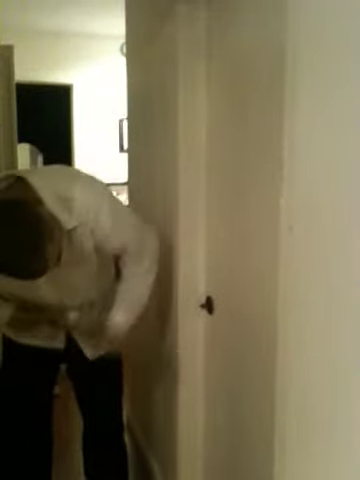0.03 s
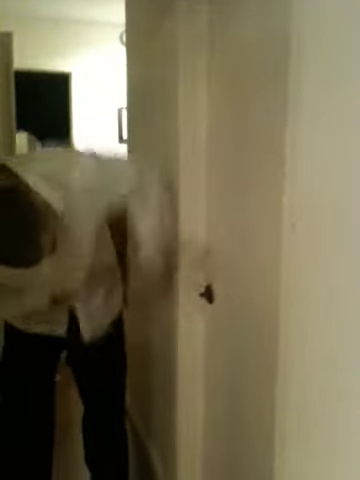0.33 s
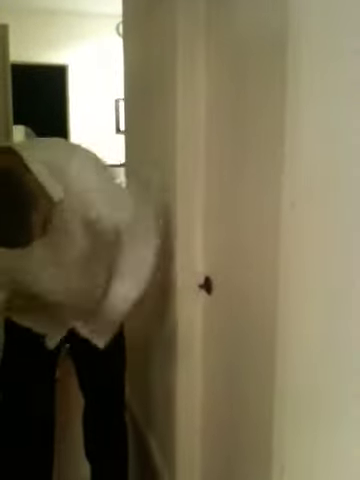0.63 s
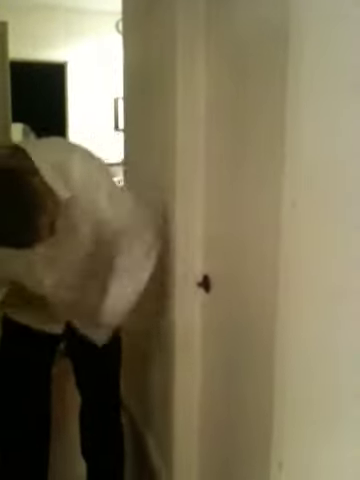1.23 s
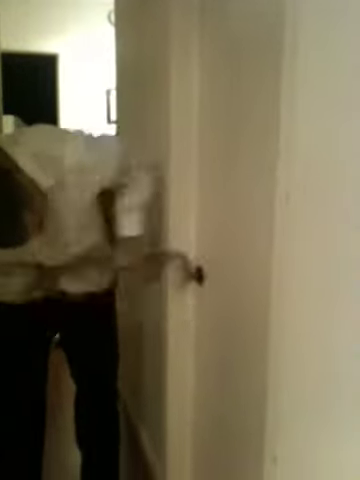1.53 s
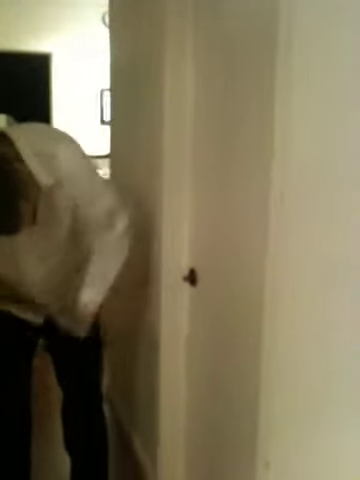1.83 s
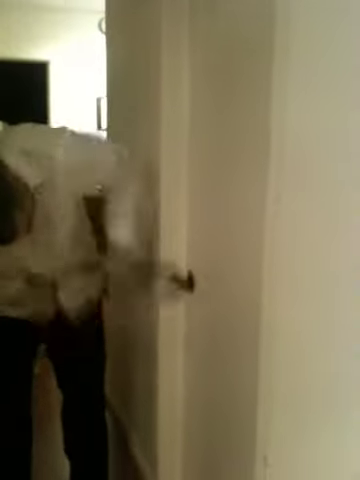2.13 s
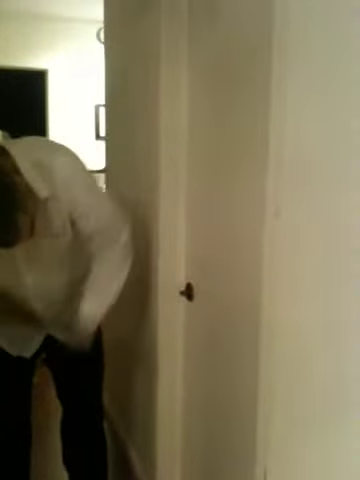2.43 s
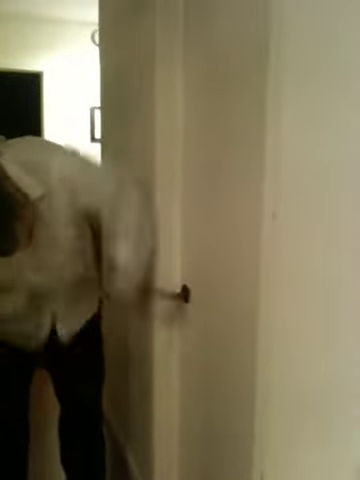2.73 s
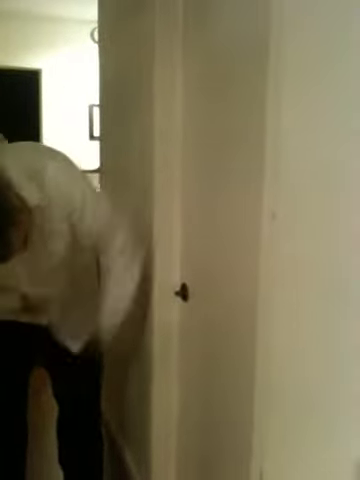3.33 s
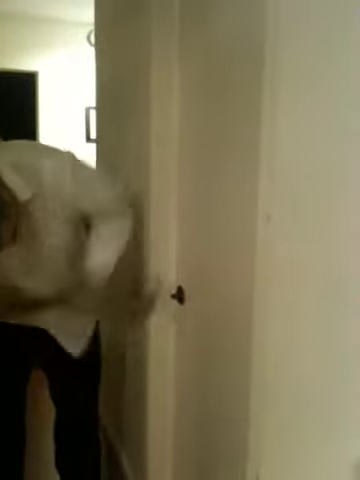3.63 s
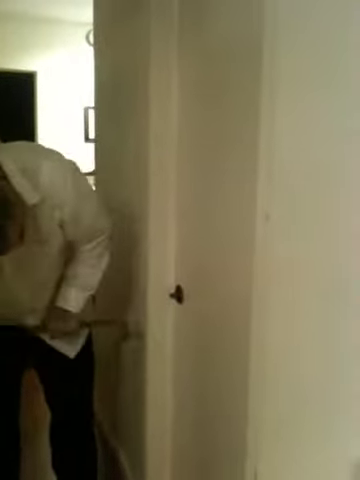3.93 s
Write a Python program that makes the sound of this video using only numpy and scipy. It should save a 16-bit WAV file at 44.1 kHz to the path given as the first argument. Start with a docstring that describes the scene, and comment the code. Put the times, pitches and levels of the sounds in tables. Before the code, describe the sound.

Loud metal bangs on a doorknob, repeating steadily in an echoing hallway.

```python
"""Metal bar on a doorknob

Someone swings a metal bar at the knob of a closed wooden door, about every 0.6 s, in a bare hallway.
Each impact cracks and excites the modes of bar, knob and door: the metal rings and the panel booms.
The hallway reverberates and the microphone overloads. The loose knob jingles faintly between some blows."""
import sys
import numpy as np
from scipy import signal
from scipy.io import wavfile

SR = 44100
rng = np.random.default_rng(int(sys.argv[2]) if len(sys.argv) > 2 else 0)


def log_audio(samples):
    """Write samples as a 16-bit WAV file to the path given in sys.argv[1]."""
    # one column per channel
    frames = np.atleast_2d(samples).T
    # limit to full scale, then quantise
    limited = np.clip(frames, -1, 1)
    pcm = np.round(limited * 32767).astype(np.int16)
    wavfile.write(sys.argv[1], SR, pcm)


N = 176400
AGE = np.arange(int(.65 * SR)) / SR  # time since an impact [s]
EDGES = np.geomspace(22, 17500, 30)  # third-octave band edges [Hz]
CENTRES = np.sqrt(EDGES[1:] * EDGES[:-1])

def from_db(db):
    """Amplitude ratio: a factor of ten for every 20 dB."""
    return 10 ** (np.asarray(db) / 20)

def at_hz(points, hz):
    """Interpolation of (frequency, value) points on a log-frequency axis."""
    frequencies, values = np.transpose(points)
    return np.interp(np.log(hz), np.log(frequencies), values)

def band_pass(sound, k):
    """Band-pass filtering to third-octave band k."""
    return signal.sosfilt(signal.butter(2, EDGES[k:k + 2], "band", fs=SR, output="sos"), sound)

def noise_bands(size):
    """Filter-bank analysis of white noise, one row per band."""
    white = rng.standard_normal((2, size + SR // 4))
    return np.array([band_pass(white[k % 2], k)[-size:] for k in range(len(CENTRES))])

def band_gains(spectrum):
    """Power normalisation: gains that give the bands this spectrum and a total rms near 1."""
    gain = from_db(at_hz(spectrum, CENTRES))
    return gain / np.sqrt(np.sum(gain ** 2 * np.diff(EDGES)) * 2 / SR)

def decay(t60):
    """Exponential damping: a fall of 60 dB in t60 seconds."""
    return np.exp(-np.log(1000) * AGE / t60)

def swell_and_die(swell_s, t60):
    """Transient response: first-order build-up, then exponential decay."""
    return (1 - np.exp(-AGE / swell_s)) * decay(t60)

def add(track, time_s, sound):
    """Superposition of a sound at an onset time, which may be negative."""
    start = int(round(time_s * SR))
    part = sound[max(-start, 0):N - start]
    track[max(start, 0):max(start, 0) + len(part)] += part

def ring(modes, colour, swell_s, scatter_db=2, wander=1):
    """Modal superposition: damped sinusoids of random strength and phase, wavering as reflections join."""
    out, wander_step_s = 0, .011
    for hz, db, t60 in modes:
        steps = rng.standard_normal((2, 400))
        in_phase, quadrature = (wander * np.interp(AGE / wander_step_s, np.arange(400), row)
                                for row in steps)
        phase = 2 * np.pi * (hz * AGE + rng.random())
        tone = ((1 + in_phase) * np.sin(phase) + quadrature * np.cos(phase)) / np.sqrt(1 + wander ** 2)
        gain = from_db(db + at_hz(colour, hz) + scatter_db * rng.standard_normal())
        out = out + gain * tone * swell_and_die(swell_s, t60)
    return out

# Noise floor spectrum: (frequency [Hz], relative density [dB])
FLOOR_SPECTRUM = [(30, -32), (60, -24), (100, -10), (155, 6), (210, -2), (320, 0), (550, -6), (1400, -7.5),
                  (2500, -13), (6000, -16), (11000, -19), (15500, -22)]

def background():
    """Stationary noise: faint room tone and microphone hiss."""
    return from_db(-68.2) * band_gains(FLOOR_SPECTRUM) @ noise_bands(N)

# Clinks of the loose knob: (time [s], level [dB], T60 of added damping by the bar [s])
CLINK_EVENTS = [(1.126, -41, 1.2), (1.189, -40.5, 1.5), (1.248, -48, 2.1), (1.281, -43.5, 1.4),
                (1.536, -47, 0.072), (1.699, -34, 0.91), (2.022, -58, .08), (2.445, -49.5, 0.51)]
# Modes of a clink: (frequency [Hz], level [dB], T60 before that damping [s])
LOOSE_KNOB_MODES = [(6860, -11, 0.3), (7612, -16.5, .25), (7700, -10, 0.23), (9630, -4, 0.31),
                    (13900, -21, .15)]
# Reflections of a clink: (frequency [Hz], relative density [dB])
WASH_SPECTRUM = [(2000, -28.5), (4500, -15), (6800, -7), (8500, -11), (10000, -14), (12000, -20),
                 (15000, -15.5)]

def loose_knob():
    """Damped free vibration: light contacts excite high modes and a wash of reflections."""
    out, swell_s = np.zeros(N), .0049
    flat = [(hz, 0) for hz in CENTRES]
    for time_s, db, damping_t60 in CLINK_EVENTS:
        tones = ring(LOOSE_KNOB_MODES, flat, swell_s)
        wash = from_db(-6.5) * band_gains(WASH_SPECTRUM) @ noise_bands(len(AGE))
        wash *= swell_and_die(swell_s, t60=.27)
        add(out, time_s, from_db(db) * (tones + wash) * decay(damping_t60))
    return out

# Reverberant spectrum of the hallway: (frequency [Hz], relative density [dB])
HALL_SPECTRUM = [(35, -27.5), (80, -24), (115, -11.5), (170, -0.5), (300, 1.5), (520, 3), (1000, -1.5),
                 (1700, -6), (2600, -7), (3600, -10), (6000, -7), (8200, -13.5), (10500, -13), (15000, -23)]
# Reverberation time: (frequency [Hz], T60 [s])
HALL_DECAY = [(60, .48), (200, 0.46), (500, 0.45), (1400, 0.55), (3000, 0.45), (6000, 0.44), (10000, 0.39),
              (15000, 0.097)]

def hallway(colour, walls):
    """Diffuse reverberation: the bass builds up later and the treble dies first."""
    same_share = .2  # fraction of the reflected power that repeats on every blow
    reflections = np.sqrt(same_share) * walls + np.sqrt(1 - same_share) * noise_bands(len(AGE))
    hz = CENTRES[:, None]
    swell_s = .003 + 2 / np.maximum(hz, 71)  # 3 ms plus two periods, down to the door's lowest mode
    envelopes = swell_and_die(swell_s, at_hz(HALL_DECAY, hz))
    gains = band_gains(HALL_SPECTRUM) * from_db(-14 + at_hz(colour, CENTRES))
    return gains @ (reflections * envelopes)

# Modes of the wooden panel: (frequency [Hz], level [dB], T60 [s])
DOOR_MODES = [(71, -45, 0.54), (104, -31, 0.3), (118.8, -30, 0.29), (154, -13, 0.35), (183, -16, 0.38),
              (205.4, -9, 0.22), (236.8, -12, 0.38), (289.3, -12, 0.23), (321.8, -16, 0.37),
              (336.7, -19, 0.33), (387.7, -18, 0.42), (429, -18, 0.33), (468, -24, 0.42),
              (523, -25.5, 0.23), (666, -19.5, 0.21)]

def door_boom(colour):
    """Plate resonance: the low modes of the door build up slowly and boom."""
    return ring(DOOR_MODES, colour, swell_s=.017, scatter_db=1.5, wander=.46)

# Modes of the steel bar: (frequency [Hz], level [dB], T60 [s])
BAR_MODES = [(737, -21, .31), (790, -17, .31), (921, -17, .31), (1078, -17, .31), (1225, -24, .33),
             (1270, -21, .33), (1334, -23, .4), (1461, -24, .36), (1641, -22, .42), (1679, -21, .35),
             (1885, -23, .32), (2210, -27, .33), (2535, -30, .4), (2630, -31, .4)]
# Modes of knob and latch: (frequency [Hz], level [dB], T60 [s])
KNOB_MODES = [(4280, -34, .33), (4990, -32, .36), (5490, -33, .3), (6075, -33, .42), (6143, -28, .28),
              (6770, -33, .3), (7220, -33, .22), (8120, -36, .32), (9430, -30, .18), (9680, -36, .3),
              (10850, -35, .2), (12380, -34, .2)]

def metal_clang(colour, favoured_hz, boost_db):
    """Selective excitation: the point of contact favours the metal's modes near one frequency."""
    modes, width_octaves = [], .12
    for hz, db, t60 in BAR_MODES + KNOB_MODES:
        nearness = np.exp(-(np.log2(hz / favoured_hz) / width_octaves) ** 2)
        modes.append((hz, db + boost_db * nearness, t60))
    return ring(modes, colour, swell_s=.002)

# Contact spectrum of knob and latch: (frequency [Hz], relative density [dB])
CRACK_SPECTRUM = [(40, -23), (100, -18.5), (200, -7), (500, 5.5), (900, 4.5), (1600, 3.5), (3300, -4),
                  (5800, 2), (8000, -5.5), (10500, -3), (15000, -14.5)]

def crack(colour):
    """Shot noise: metal meets metal in a quickly dying burst of tiny random contacts."""
    contacts_per_s = 5000
    touching = rng.random(len(AGE)) < contacts_per_s / SR
    impulses = touching * rng.choice([-1, 1], len(AGE)) * np.sqrt(SR / contacts_per_s)
    tick = from_db(-.5) * decay(t60=.03)  # the first contact stands out of the chatter
    chatter = impulses * (tick + swell_and_die(swell_s=.0017, t60=.13)) + 1e-18
    gains = band_gains(CRACK_SPECTRUM) * from_db(-6.5 + at_hz(colour, CENTRES))
    return sum(gain * (-1) ** k * band_pass(chatter, k) for k, gain in enumerate(gains))

# Anchors of a blow's tone colour, for boom, knock, clang, edge, treble and top: (frequency [Hz])
COLOUR_ANCHORS = [220, 750, 1500, 2900, 5800, 10500]
# Blows, the first already dying away at the start: (time [s], level [dB], rise time [s],
# six gains at the colour anchors [dB], favoured frequency [Hz], its boost [dB])
BLOW_EVENTS = [(-.09, -2, .0005, -2, -3.5, -1.5, -2, -3.5, 2, 10000, 6),
               (0.4233, -2, 0.00029, -1.5, 1.5, -3.5, -3.5, -2.5, -2.5, 1005, 6.5),
               (1.013, -1, 0.0035, 0.5, 0.5, -2.5, -2.5, -3.5, 3, 9500, 1.5),
               (1.5876, -2, 0.00047, 3, 2.5, 2, 4.5, -1.5, 2.5, 6000, 6),
               (2.223, -3, 0.0011, 1.5, 1, 1.5, 1, -2.5, 0.5, 2520, 8.5),
               (2.8521, -3.5, 0.00026, 3.5, 2.5, -0.5, 3.5, 2.5, 1.5, 4950, 6.5),
               (3.503, 0, 0.00029, -0.5, -1.5, 0.5, -3, -3, 0, 1666, 0)]

def blows():
    """Impact excitation: each blow drives door, metal and hallway with its own rise and tone colour."""
    out, walls = np.zeros(N), noise_bands(len(AGE))
    for time_s, db, rise_s, *colour_db, favoured_hz, boost_db in BLOW_EVENTS:
        colour = list(zip(COLOUR_ANCHORS, colour_db))
        boom = door_boom(colour)
        clang = metal_clang(colour, favoured_hz, boost_db)
        onset = 1 - np.exp(-AGE / rise_s)
        add(out, time_s, from_db(db) * onset * (crack(colour) + boom + clang + hallway(colour, walls)))
    return out

def scene():
    """Linear superposition of all sources at one microphone."""
    return (blows() + loose_knob() + background())[None]

def record(dry):
    """Limiting and saturation: peaks are ducked, what gets past overloads the input; the top is cut."""
    attack_s, release_db_per_s = .0023, 800
    ceiling, hardness, cutoff_hz = .66, 4, 15700
    over_db = np.maximum(20 * np.log10(np.abs(dry) + 1e-9), 0)  # excess over full scale
    fall_db = release_db_per_s * np.arange(N) / SR
    held_db = np.maximum.accumulate(over_db + fall_db, axis=-1) - fall_db
    pole = np.exp(-1 / (attack_s * SR))
    reduction_db = signal.lfilter([1 - pole], [1, -pole], held_db)
    limited = dry * from_db(-reduction_db)
    clipped = limited / (1 + np.abs(limited / ceiling) ** hardness) ** (1 / hardness)
    return signal.sosfiltfilt(signal.butter(16, cutoff_hz, fs=SR, output="sos"), clipped)

dry = scene()
out = record(dry)
log_audio(out)
```